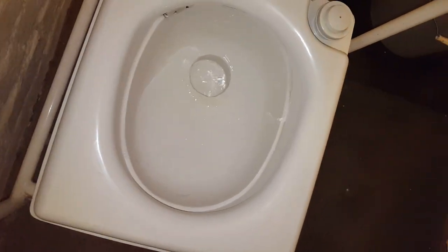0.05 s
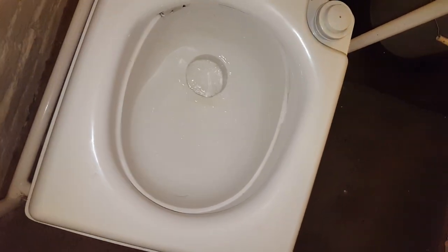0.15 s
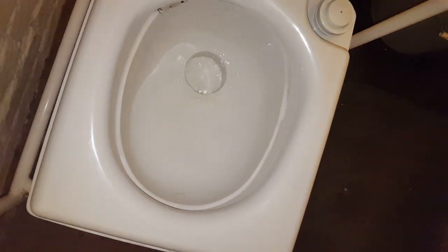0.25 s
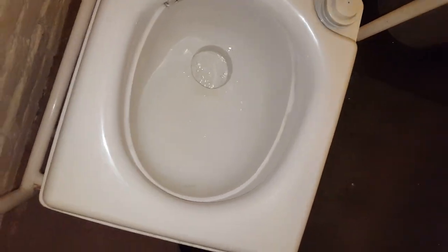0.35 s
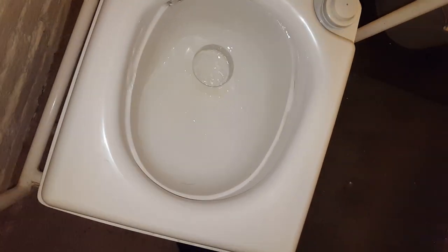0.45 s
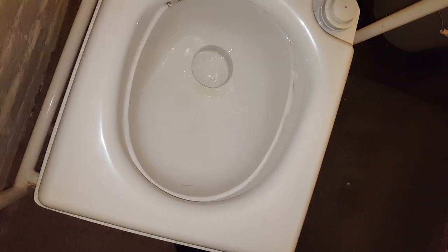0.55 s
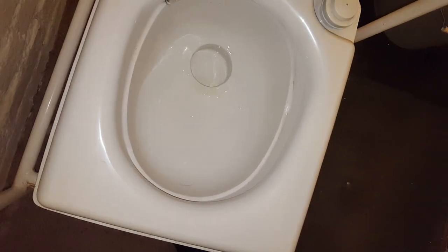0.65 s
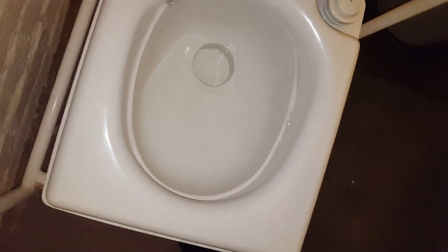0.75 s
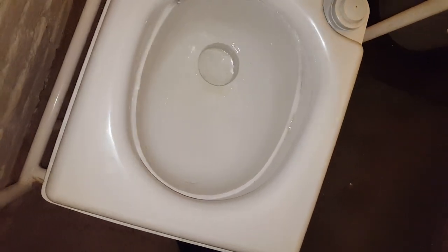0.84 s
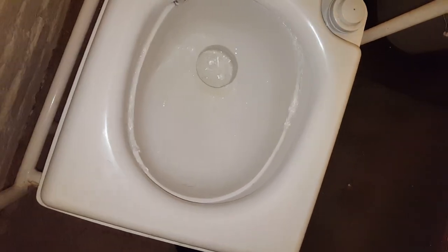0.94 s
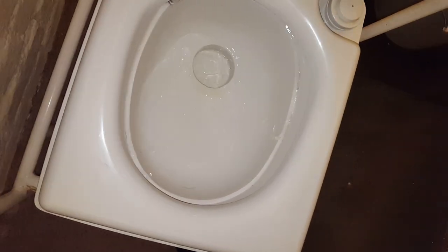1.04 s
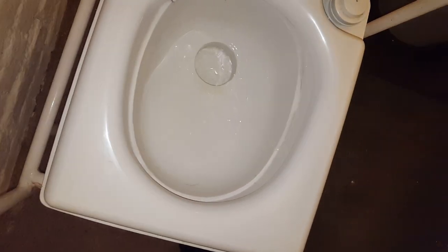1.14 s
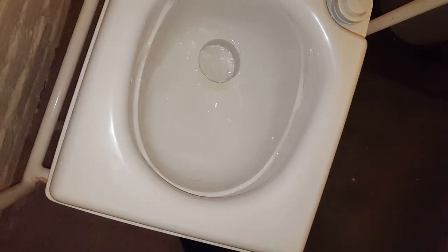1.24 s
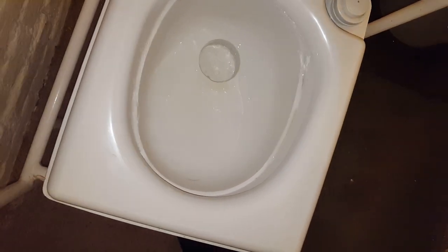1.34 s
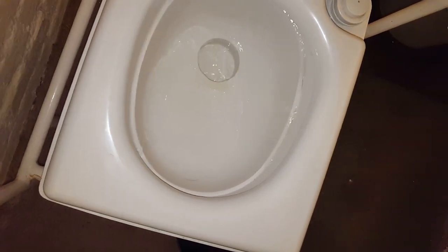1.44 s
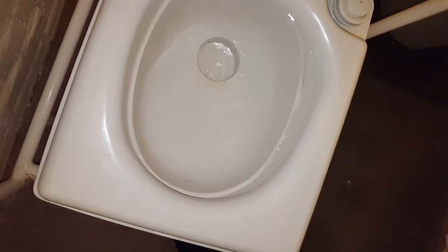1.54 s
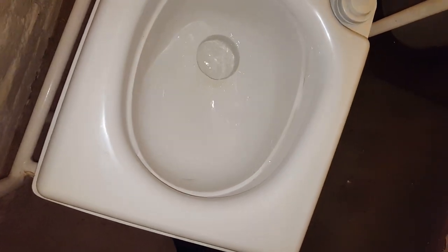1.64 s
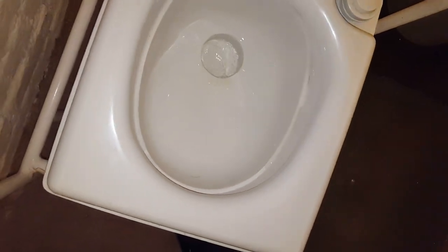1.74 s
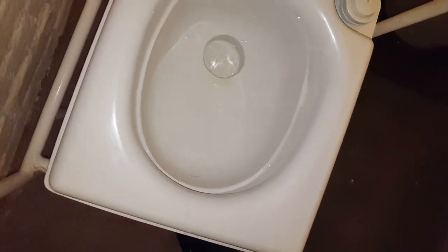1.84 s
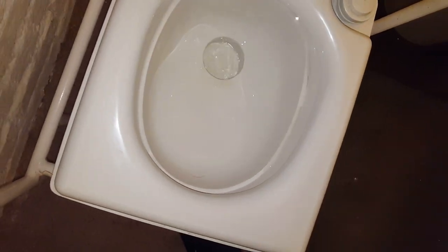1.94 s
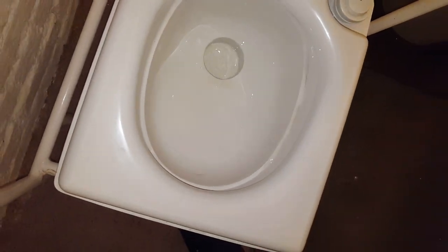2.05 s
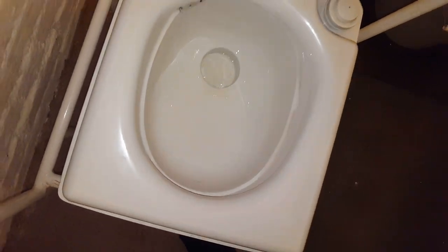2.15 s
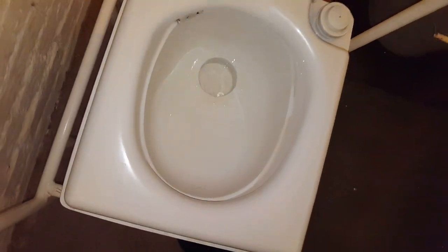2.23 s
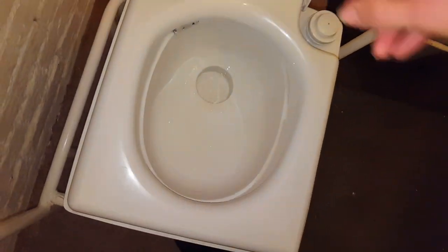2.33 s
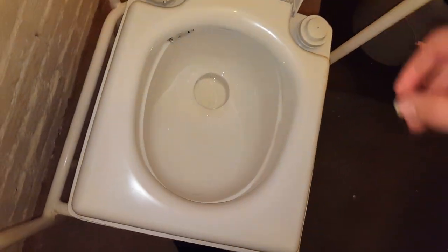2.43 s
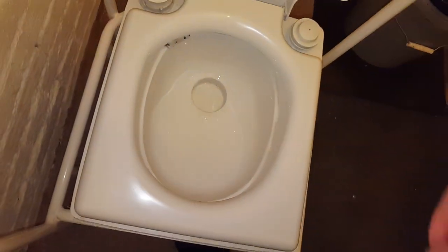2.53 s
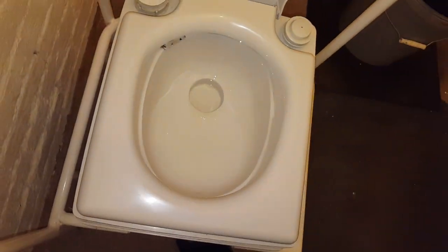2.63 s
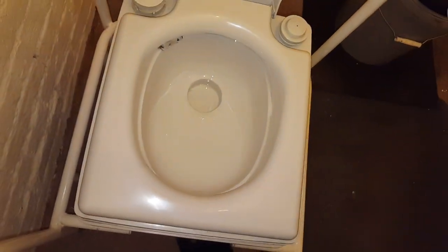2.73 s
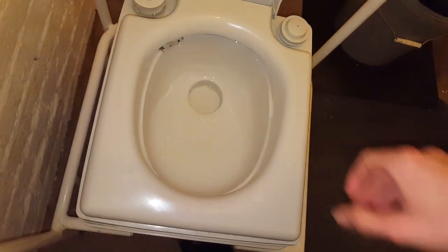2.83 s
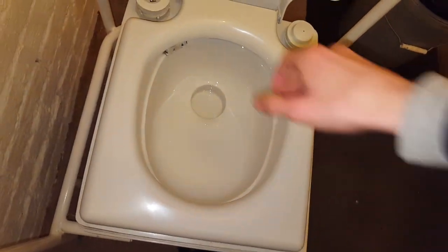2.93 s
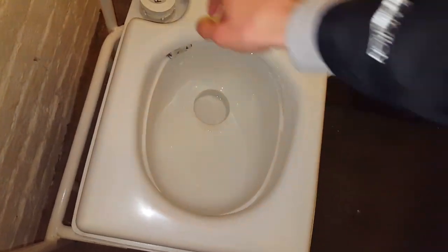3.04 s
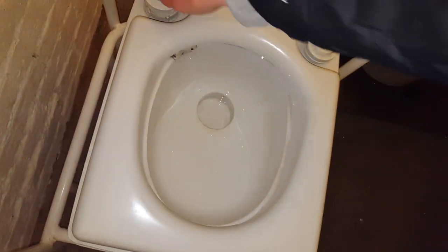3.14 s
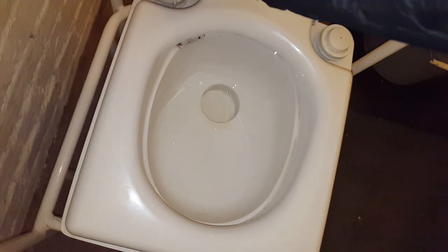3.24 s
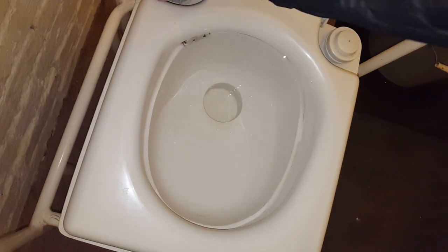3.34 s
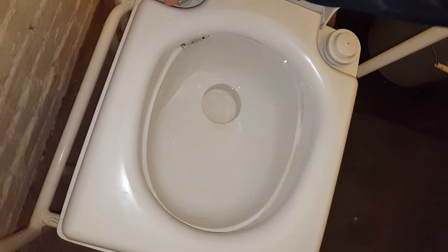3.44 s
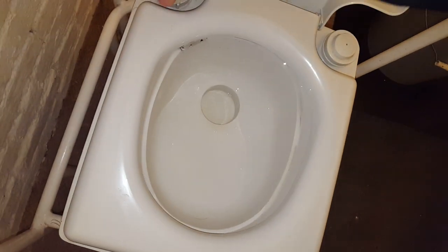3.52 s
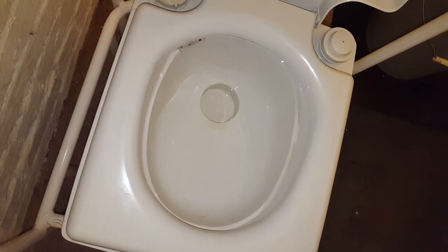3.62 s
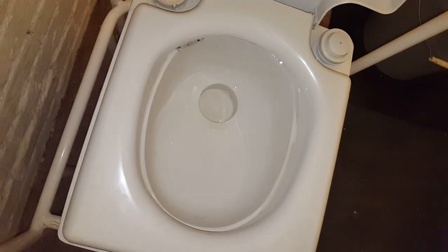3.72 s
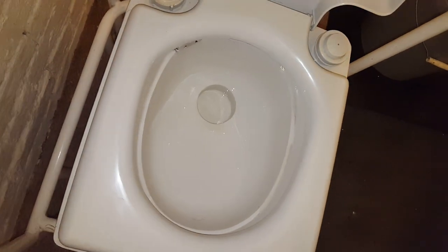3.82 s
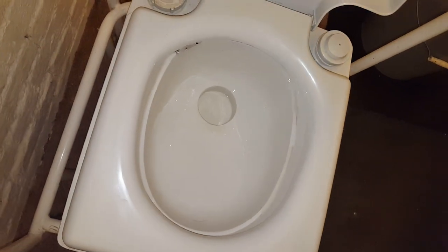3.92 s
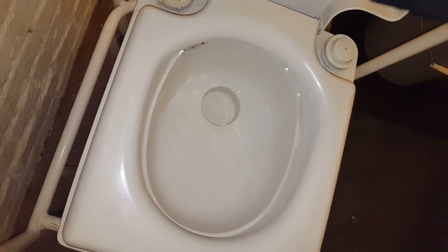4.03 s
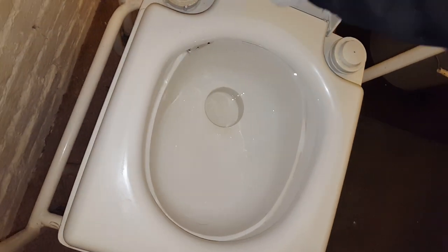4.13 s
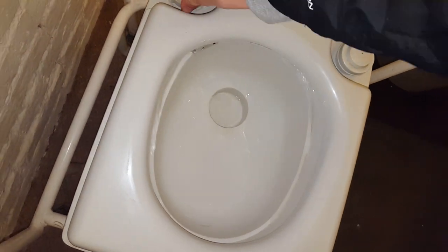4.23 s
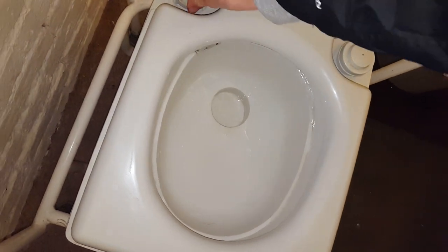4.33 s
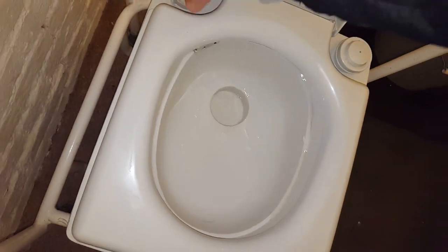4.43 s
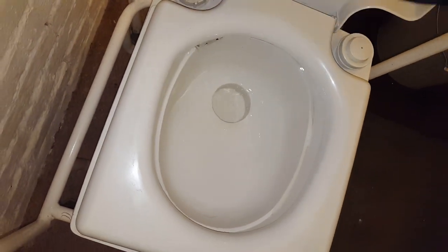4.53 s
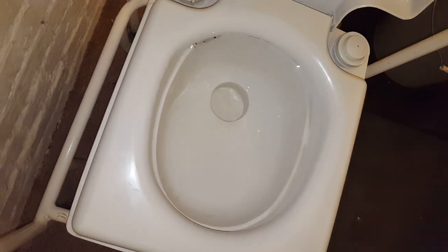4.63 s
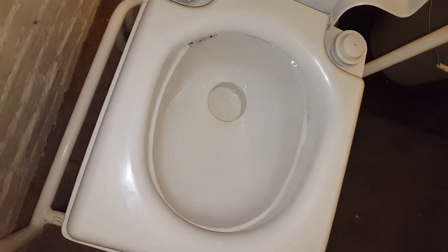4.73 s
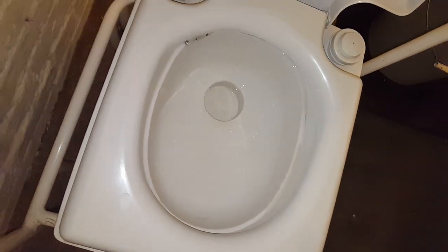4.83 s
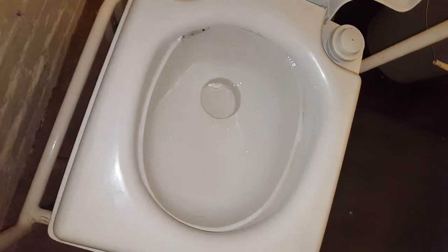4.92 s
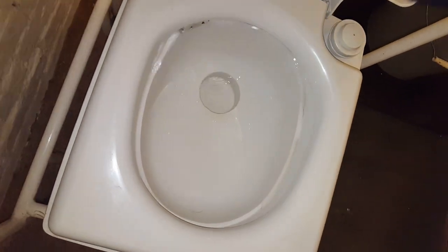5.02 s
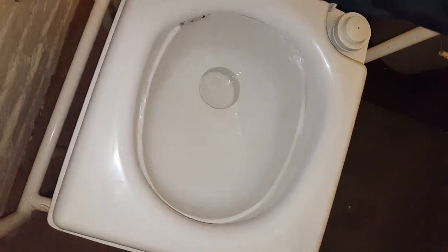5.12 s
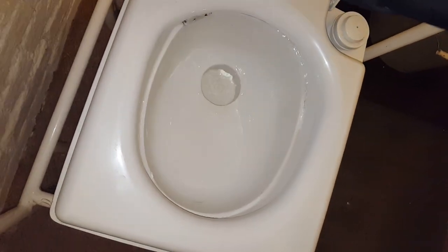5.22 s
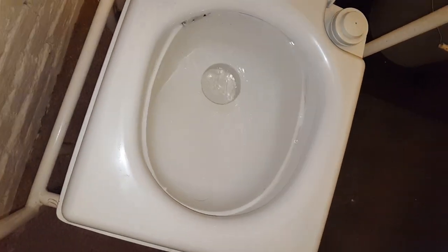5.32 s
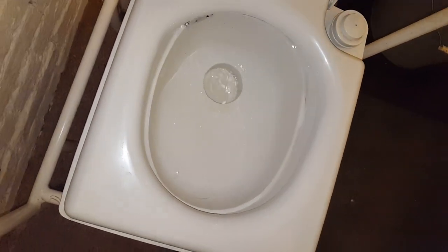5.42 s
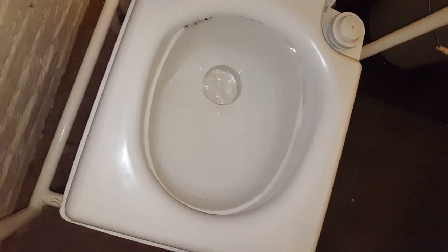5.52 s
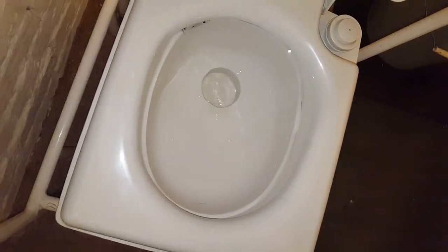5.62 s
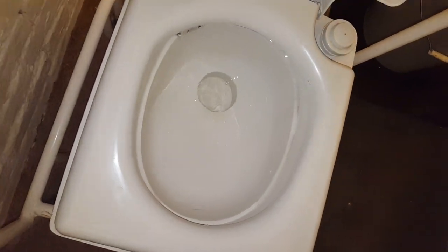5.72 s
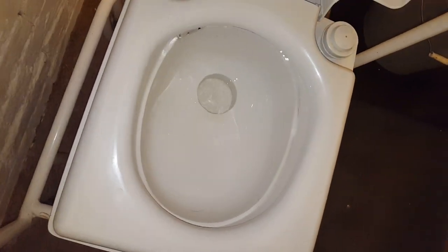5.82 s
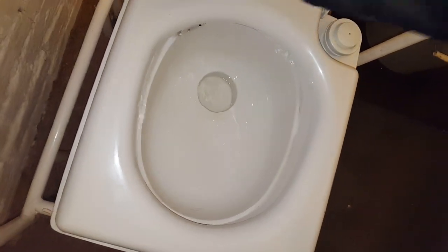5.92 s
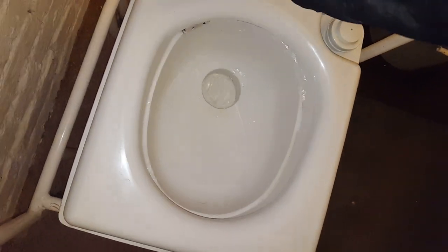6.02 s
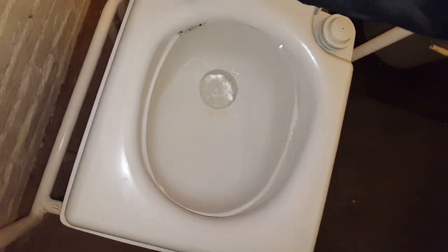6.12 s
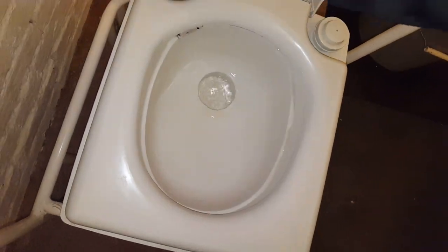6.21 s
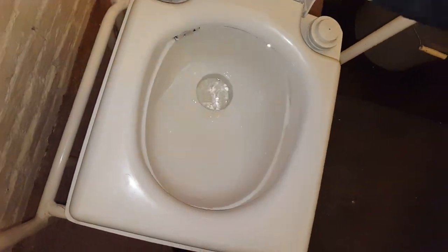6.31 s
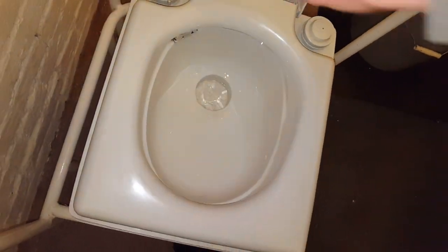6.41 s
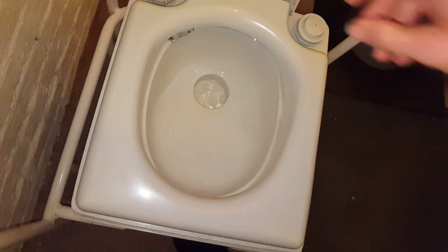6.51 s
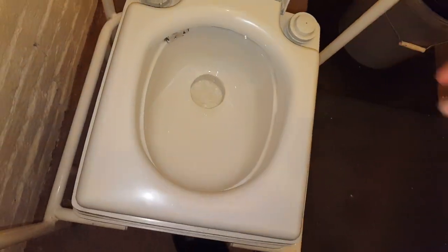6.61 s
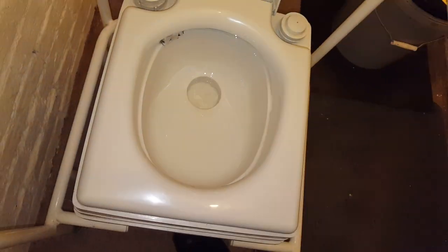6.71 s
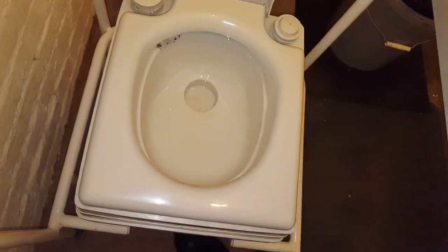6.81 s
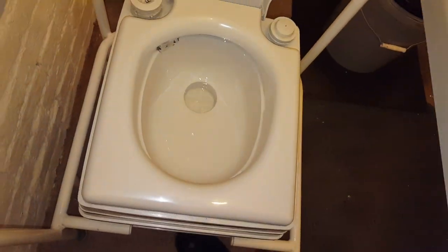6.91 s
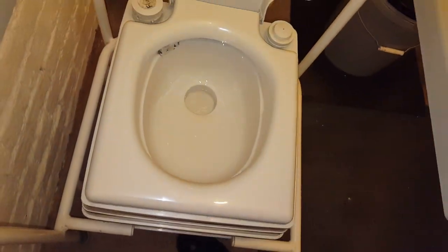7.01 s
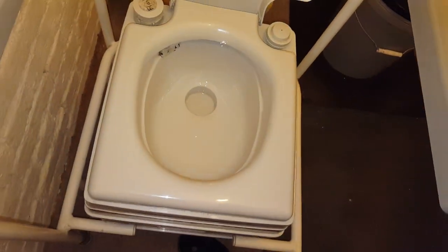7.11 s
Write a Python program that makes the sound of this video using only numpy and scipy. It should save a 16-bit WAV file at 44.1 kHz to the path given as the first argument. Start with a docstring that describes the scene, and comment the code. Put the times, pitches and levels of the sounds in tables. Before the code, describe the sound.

Heard in stereo from just over the bowl in a cramped outbuilding, a plastic piston clacks and bounces while water squirts, splashes and gurgles in brief bursts. The first run is fast and dense, followed by over a second of near silence with faint ticks and jacket rustling. Pumping then resumes with more space between strokes, a few bright cracks and watery gulps, ending in quiet with small ticks.

```python
"""In a small outbuilding a portable toilet is flushed by its hand pump, in two runs of strokes
heard from just above the bowl. Knocks ring resonances of the water tank and the plastic pump housing.
Filtered random drops and ringing air pockets make the water that gurgles, splashes and sprays.
Bursts of noise make the nozzle's spitting and the small ticks, low bending tones make the gulps of air,
and grainy noise makes a rustling jacket sleeve."""
import sys
import numpy as np
from scipy import signal
from scipy.fft import rfft, irfft, next_fast_len
from scipy.io import wavfile
from scipy.ndimage import uniform_filter1d, map_coordinates

SR = 44100
rng = np.random.default_rng(int(sys.argv[2]) if len(sys.argv) > 2 else 0)


def materialize(psi):
    """Save the field psi as 16-bit PCM at rate SR to the path in sys.argv[1].

    A 1-D psi becomes a single channel; in a 2-D psi each row is a channel.
    """
    bounded = np.clip(np.atleast_2d(psi).T, -1, 1)
    quanta = np.round(bounded * 32767).astype(np.int16)
    wavfile.write(sys.argv[1], SR, quanta)


N = 315756

# Event levels are balanced further where each sound is mixed; mode and colour levels are only relative.
# piston contacts: (time [s], tank thud [dB], housing knock [dB], crack [dB], rebound strength [0-1])
KNOCKS = [(.003, -27, -23.5, -43, 0.01), (.251, -17.5, -11.5, -25.5, 0.52),
          (0.307, -21.5, -13.5, -26, 0.78), (.347, -24.5, -18, -35, 0), (.666, -20, -12.5, -27.5, 0.8),
          (.728, -21.5, -33, -40, 0.3), (1.083, -18.5, -12.5, -26.5, 0.03),
          (1.115, -20.5, -15, -29.5, 0.01), (1.165, -33, -22.5, -37, 0.01), (1.244, -37, -23, -39.5, 0.02),
          (1.364, -31.5, -19, -42, 0.01), (1.395, -24.5, -24, -37, 0), (1.449, -27.5, -23, -32, 0),
          (1.498, -41.5, -29, -45.5, 0), (1.552, -35.5, -34, -39.5, 0), (1.648, -20.5, -15.5, -27, 0.03),
          (1.672, -36, -14, -26, 0), (1.702, -21.5, -16, -30.5, 0.64), (1.745, -21.5, -13.5, -17.5, 0.04),
          (1.862, -34.5, -32, -48, 0), (1.947, -45, -39.5, -64, 0), (3.333, -37.5, -35.5, -50, 0.34),
          (3.606, -34.5, -33, -52.5, 0), (3.666, -32.5, -26, -33.5, 0.05), (3.779, -20, -18.5, -32, .55),
          (3.833, -23, -20.5, -35, 0.27), (4.001, -54, -32, -40, 0.01), (4.063, -29, -28.5, -61, 0.01),
          (4.086, -26.5, -20, -34.5, 0.01), (4.272, -21.5, -16, -20, 0.23), (4.49, -32, -36, -41.5, 0.01),
          (4.886, -30, -23.5, -37.5, 0.01), (4.932, -22, -20.5, -38.5, 1), (5.147, -16.5, -15.5, -18, .33),
          (5.604, -26, -23.5, -52, 0.01), (5.64, -21.5, -28, -57, 0), (5.716, -37, -40.5, -51, 0.06),
          (5.791, -30.5, -33, -48.5, 0.01), (5.817, -26, -25, -49, 0.01), (6.005, -15, -16.5, -18, .25)]
REBOUND_S = .018  # a piston that bounces lands again this much later
# the tank and the closet around it: (frequency [Hz], level [dB], time to fall 60 dB [s])
TANK_MODES = [(81, -19, 0.32), (95, -29, 0.33), (136.3, -6.5, 0.43), (154, -6, 0.12), (210.5, -5, .32),
              (240.8, -7, 0.39), (255.2, -5, 0.19), (286.9, -7.5, 0.33), (328.95, -5, 0.13),
              (383.7, 0, 0.087), (401.9, 3, 0.09), (463, -6.5, 0.089), (522.7, -6, 0.15), (605, -8, 0.14)]
# the plastic pump housing: (frequency [Hz], level [dB], time to fall 60 dB [s])
HOUSING_MODES = [(694, -11.5, 0.012), (873, -7.5, .04), (948, 3, 0.038), (1110, -2.5, 0.043),
                 (1262, 3.5, 0.028), (1584, -3.5, 0.02), (1910, -9, 0.028), (2070, -21, 0.019),
                 (3820, -15, 0.01)]
# colour of the sharp contact: (frequency [Hz], level [dB])
CRACK_COLOUR = [(1200, -25), (2300, 3.5), (2900, -0.5), (3800, -1), (5000, -6.5), (6800, -8),
                (10000, -19.5), (14000, -26.5), (16000, -38)]
# colour of the loose plastic: (frequency [Hz], level [dB])
CLATTER_COLOUR = [(150, -38.5), (450, 7), (700, 1), (980, 9.5), (1400, 4.5), (2100, -6.5), (3200, -50.5)]
CLATTER_S, CRACK_S = .07, .013  # time to fall 60 dB, for loose plastic and for the contact itself
# the valve plate snaps shut: (time [s], level [dB])
VALVE = [(4.885, -31.5), (4.933, -48), (4.95, -36), (5.794, -44)]
# the ringing valve plate: (frequency [Hz], level [dB], time to fall 60 dB [s])
VALVE_MODES = [(3050, -5, .018), (3290, 1, .028), (3480, -1, .03), (3760, -8, .028)]

# pulls, pushes and small nudges of the piston: (start [s], length [s], tank gurgle [dB],
# bowl splash [dB], nozzle spray [dB], swell over the stroke [dB], centre pitch of air pockets [Hz])
STROKES = [(-.04, 0.03, -27, -37, -42, 6.5, 1220), (0.123, .21, -25.5, -28, -36.5, 15, 1093),
           (0.426, 0.06, -22, -18.5, -26, 4, 1153), (0.667, .06, -26.5, -28.5, -33.5, 1, 998),
           (0.831, 0.074, -16.5, -16.5, -22.5, 2, 1146), (1.087, .075, -31, -28, -35, -1, 1035),
           (1.282, 0.076, -22, -17.5, -24.5, 0, 1146), (1.418, 0.037, -25.5, -29.5, -36.5, -1, 1200),
           (1.614, 0.16, -25, -27, -34.5, 6.5, 1020), (3.37, 0.2, -47, -56, -78.5, 1, 900),
           (3.691, 0.083, -19.5, -26, -35, 1.5, 1178), (3.88, .1, -40, -42, -58, -8, 1097),
           (4.113, 0.18, -30, -30.5, -33.5, 2.5, 1024), (4.547, .075, -28, -24, -33.5, 3.5, 1030),
           (4.685, 0.026, -28, -24.5, -34.5, -0.5, 1053), (4.99, .17, -26, -26.5, -32.5, 6.5, 1068),
           (5.384, 0.22, -30.5, -29, -35.5, 3, 1242), (5.865, 0.17, -27, -29, -32, 2, 1046)]
# how the tank gurgle follows a stroke: (delay [s], rise [dB per s], fall [dB per s])
GURGLE_FLOW = (0.026, 220, 141)
# how the bowl splash follows a stroke: (delay [s], rise [dB per s], fall [dB per s])
SPLASH_FLOW = (.008, 220, 282)
# how the nozzle spray follows a stroke: (delay [s], rise [dB per s], fall [dB per s])
SPRAY_FLOW = (.001, 320, 235)
# after each stroke the water runs down the bowl, more weakly and for longer: level against the splash, fall
TRICKLE_DB, TRICKLE_DB_PER_S = -13.5, 105.5
# fine drops go on landing after the nozzle has stopped: level against the spray, fall
MIST_DB, MIST_DB_PER_S = -12, 112.5
# colour of water hitting the bowl: (frequency [Hz], level [dB])
SPLASH_COLOUR = [(200, -37.5), (500, -1.5), (690, -11), (950, -2), (1200, 1), (1600, -3), (2100, -4),
                 (2900, -24.5), (4500, -34), (7000, -36.5)]
# colour of the fine spray: (frequency [Hz], level [dB])
SPRAY_COLOUR = [(1200, -9.5), (2500, 1.5), (3300, 2.5), (4500, -4), (6800, -3.5), (8500, -7),
                (10500, -15.5), (13500, -16.5), (16000, -26.5)]
BUBBLE_SPREAD_DB = 3  # how unequal the air pockets are

# air gulps into the tank and its walls bump: (time [s], pitch it settles at [Hz], level [dB])
GULPS = [(0.021, 137.5, -23), (.173, 241, -16), (.28, 78, -23), (.714, 82.9, -24), (.855, 211, -16.5),
         (.891, 75, -27), (.935, 135, -13.5), (.951, 258.8, -17.5), (1.294, 81, -23), (1.33, 218, -17),
         (1.709, 88, -19.5), (2.05, 201, -58), (3.075, 85.5, -43), (3.25, 90.5, -40), (3.319, 92, -37.5),
         (3.678, 86, -24), (3.699, 237, -15.5), (3.787, 218.5, -13.5), (3.801, 321, -17),
         (3.826, 143.6, -16), (3.85, 234.5, -22.5), (5.13, 84.7, -21), (5.632, 242, -24),
         (5.886, 229.1, -22.5), (6.112, 139, -22.5), (6.32, 211, -41.5)]
# air spitting from the nozzle: (time [s], pitch [Hz], level [dB])
SPITS = [(0.415, 5800, -26.5), (0.817, 6000, -23), (0.828, 8600, -21.5), (1.264, 7080, -19.5),
         (3.641, 4000, -38), (3.665, 6800, -26.5), (3.678, 3160, -21.5), (3.691, 6220, -23),
         (3.719, 6000, -23.5), (4.136, 7520, -27), (4.696, 8330, -28), (5.093, 7040, -30.5)]
# small ticks of drips and of the hand on the plastic:
# (time [s], level [dB], pitch [Hz], factor that the band reaches below and above it)
TICKS = [(2.267, -54, 700, 2.2), (2.517, -46.5, 950, 1.85), (2.623, -49.5, 650, 1.4),
         (3.140, -42, 871, 1.7), (3.228, -33.5, 977, 3.7), (3.246, -36, 3000, 2.3),
         (3.279, -37.5, 594, 2.9), (3.335, -35, 1686, 2.1), (3.344, -34, 1284, 2.3), (3.38, -39, 562, 1.3),
         (3.478, -42, 770, 1.5), (3.559, -45, 900, 1.5), (4.453, -47.5, 3200, 2.2),
         (5.281, -41.5, 2790, 3.9), (6.461, -37, 1930, 1.45), (6.622, -44.5, 1050, 1.8)]

# tail of the closet: (frequency [Hz], time to fall 60 dB [s])
CLOSET_TAIL = [(120, 0.52), (400, 0.27), (1200, 0.18), (3000, 0.14), (10000, 0.1)]
# likeness of left and right in spread sound: (frequency [Hz], likeness [0-1])
ALIKE = [(130, 0.98), (290, 0.99), (640, 0.77), (1400, 0.25), (3100, 0.071), (6800, 0)]
# tilt of the toilet between the sides: (frequency [Hz], level up on the left and down on the right [dB])
LEAN = [(150, 0.7), (500, -1.2), (1200, 0.5), (4500, 1.27), (9000, 1)]
LAG = 4  # samples by which the right microphone hears the toilet later

# sweeps of the arm, reaching and drawing back: (time when fastest [s], half length [s], rustle [dB])
SLEEVE = [(2.52, 0.19, -55), (2.922, 0.22, -58.5), (3.21, 0.15, -44), (3.504, 0.077, -51),
          (6.336, 0.094, -52.5), (6.692, .17, -50.5)]
SLEEVE_REST_DB = -68  # the arm is never quite still
# colour of the rubbing sleeve: (frequency [Hz], level [dB])
NYLON_COLOUR = [(40, -19), (140, -8), (300, -13), (800, -16.5), (1500, -18.5), (3200, -17), (8000, -23.5),
                (10500, -31), (14000, -28.5), (16000, -36)]
# colour of the still background: (frequency [Hz], level [dB])
STILL_COLOUR = [(20, 5.5), (45, 2), (107, -15.5), (150, -5), (175, -11.5), (262, -13.5), (660, -12.5),
                (1150, -21.5), (4500, -23.5), (16000, -31)]
TOP_HZ = 16100  # nothing is kept from here up


def amp(db):
    """Turn decibels into gain."""
    return 10 ** (np.asarray(db) / 20)


def unit(x, size=None):
    """Scale x so that its first samples (all by default) have an average strength (rms) of 1."""
    return x / np.sqrt(np.mean(x[..., :size] ** 2) + 1e-20)


def even(x, size):
    """Take out slow swells: the strength stays near 1 over any window of size samples."""
    power = uniform_filter1d(np.mean(x ** 2, axis=0), size)
    return x / np.sqrt(np.abs(power) + 1e-12)


def along(points, hz):
    """Read (frequency, value) points at hz, evenly by musical interval."""
    f, v = np.transpose(points)
    return np.interp(np.log(hz + 1), np.log(f + 1), v)


def curves(rows):
    """Draw one value per sample for each column after the time."""
    s, *cols = np.transpose(rows)
    return [np.interp(np.arange(N) / SR, s, c) for c in cols]


def wobble(rate):
    """Draw a smooth random curve through rate points a second."""
    points = rng.standard_normal(int(N * rate / SR) + 4)
    return map_coordinates(points, [np.arange(N) * rate / SR])


def fade(t60):
    """A third of a second of dying away, by 60 dB every t60 seconds."""
    return amp(-60 * np.arange(SR // 3) / SR / t60)


def add(track, s, sound):
    """Mix a sound into a track at time s."""
    room_left = track[:, max(0, round(s * SR)):][:, :sound.shape[-1]]
    room_left += sound[..., :room_left.shape[-1]]


def colour(x, points, size=4096):
    """Filter x to the given spectrum without any sound ahead of its cause (minimum phase)."""
    cepstrum = irfft(np.log(amp(along(points, np.fft.rfftfreq(size, 1 / SR)))))
    # folding the second half onto the first puts the filter's energy as early as possible
    cepstrum[1:size // 2] *= 2
    cepstrum[size // 2 + 1:] = 0
    response = irfft(np.exp(rfft(cepstrum)))
    return signal.fftconvolve(x, response[None], axes=1)[:, :x.shape[1]]


def spread(pair):
    """Turn two unrelated signals into left and right: alike in the bass, apart in the treble."""
    size = pair.shape[1]
    likeness = np.clip(along(ALIKE, np.fft.rfftfreq(size, 1 / SR)), -1, 1)
    turn = np.arccos(likeness) / 2
    mid, side = irfft(rfft(pair) * [np.cos(turn), np.sin(turn)], size)
    return np.array([mid + side, mid - side])


def noise(size):
    """Hiss that seems to come from all around."""
    return spread(rng.standard_normal((2, size)))


def drops(rate, size_db):
    """Random impacts of uneven size, about rate a second in each of the two signals spread out."""
    hits = rng.random((2, N)) < rate / SR
    sizes = amp(size_db * np.clip(rng.standard_normal((2, N)), -2, 2))
    return spread(hits * sizes * rng.choice([-1, 1], (2, N)))


def ring(modes, scatter_db, detune):
    """One blow starts every mode as a fading tone; higher ones reach the two ears out of step."""
    t = np.arange(SR // 3) / SR
    out = np.zeros((2, len(t)))
    for k, (hz, db, t60) in enumerate(modes):
        size, shift = rng.standard_normal(2)
        skew = np.arccos(np.clip(along(ALIKE, hz), -1, 1)) / 2 * rng.choice([-1, 1, 1])
        phase = 2 * np.pi * hz * (1 + detune * shift) * t + np.array([[skew], [-skew]])
        strength = (-1) ** k * amp(db + scatter_db * size)
        out += strength * fade(t60) * np.sin(phase)
    return out * (1 - np.exp(-t / 0.0011))  # a soft start


def contacts():
    """Yield each piston contact and its weaker or equal rebound: (time, thud dB, knock dB, crack dB)."""
    for s, *levels_db, rebound in KNOCKS:
        yield s, *levels_db
        if rebound > 0:
            yield s + REBOUND_S, *(np.array(levels_db) + 20 * np.log10(rebound))


def knocks():
    """Each contact thuds the tank, rings the housing and cracks; loose plastic clatters on briefly."""
    out = np.zeros((2, N))
    for s, thud_db, knock_db, crack_db in contacts():
        thud = unit(ring(TANK_MODES, scatter_db=4.0, detune=0.0099), size=970)
        housing = unit(ring(HOUSING_MODES, scatter_db=2.0, detune=0.012), size=530)
        grit = noise(thud.shape[1])
        clatter = unit(colour(grit * fade(CLATTER_S), CLATTER_COLOUR), size=530)
        knock = unit(housing + amp(-0.5) * clatter, size=530)
        # a hard stop is bright; a contact cushioned by water loses its top octaves
        hardness_db = .5 * np.clip(crack_db - knock_db + 6.5, -7, 6)
        shape = [(hz, db + hardness_db * np.clip(np.log2(hz / 3500), 0, 1.5)) for hz, db in CRACK_COLOUR]
        decay = fade(CRACK_S) + amp(-11) * fade(.14)
        crack = unit(colour(grit * decay, shape), size=530)
        add(out, s, amp(thud_db - 3.0) * thud + amp(knock_db) * knock + amp(crack_db) * crack)
    for s, db in VALVE:
        snap = unit(ring(VALVE_MODES, scatter_db=3, detune=0.005352), size=530)
        add(out, s, amp(db) * snap)
    return out


def flow(levels_db, delay, rise, fall):
    """Level in dB of one part of the water: it rises, changes over the piston's stroke, and falls away."""
    t = np.linspace(0, N / SR, num=4000)
    each = []
    for (start, length, *_, swell_db, _), db in zip(STROKES, levels_db):
        age = t - start - delay
        held = np.clip(age, 0, length)
        moving_db = db + swell_db * (held / length - .5)
        before_db = rise * np.maximum(-age, 0)
        after_db = fall * np.maximum(age - length, 0)
        each.append(moving_db - before_db - after_db)
    return curves(np.column_stack([t, np.max(each, axis=0)]))[0]


def bubbles(rate, centre_hz, cycles, rise):
    """Air pockets ring near a moving pitch, gliding up as they lose 40 dB over some cycles."""
    out = np.zeros((2, N))
    t = np.arange(SR // 20) / SR
    count = int(rate * N / SR)
    starts = rng.integers(N, size=count)
    for start, (pitch, size, side) in zip(starts, rng.standard_normal((count, 3))):
        hz = centre_hz[start] * np.exp(.22 * pitch)
        age = t * hz / cycles
        glide = 1 + rise * np.minimum(age, 2) / 2
        phase = 2 * np.pi * hz * t * glide + np.array([[.6], [-.6]]) * side
        life = amp(BUBBLE_SPREAD_DB * np.clip(size, -2, 2) - 40 * age) * (1 - np.exp(-t * hz))
        add(out, start / SR, life * np.sin(phase))
    return unit(out)


def water():
    """Every stroke churns the tank and throws a spluttering sheet of drops against the bowl."""
    start, length, gurgles_db, splashes_db, sprays_db, _, pockets_hz = np.transpose(STROKES)
    # how loud each part of the water is
    gurgle_db = flow(gurgles_db, *GURGLE_FLOW)
    delay, rise, _ = SPRAY_FLOW
    mist_db = flow(sprays_db + MIST_DB, delay, rise, MIST_DB_PER_S)
    spray_db = np.maximum(flow(sprays_db, *SPRAY_FLOW), mist_db)
    delay, rise, _ = SPLASH_FLOW
    trickle_db = flow(splashes_db + TRICKLE_DB, delay, rise, TRICKLE_DB_PER_S) + 1.7 * wobble(38)
    splash_db = np.maximum(flow(splashes_db, *SPLASH_FLOW), trickle_db)
    pocket_hz, = curves(np.column_stack([start + length / 2, pockets_hz]))
    pocket_hz = pocket_hz * np.exp(0.072 * wobble(12))
    # random impacts ring the tank, or are coloured as splash and spray
    churn = drops(rate=400, size_db=2.5)[:1]
    tank_ring = ring(TANK_MODES, scatter_db=0.22, detune=0)
    tank = unit(signal.fftconvolve(churn, tank_ring, axes=1)[:, :N])
    gurgle = even(tank, size=2000)
    splash = unit(colour(drops(rate=900, size_db=1.5), SPLASH_COLOUR))
    fine_drops = unit(drops(rate=1500, size_db=5))
    spray = unit(colour(fine_drops + amp(-3) * noise(N), SPRAY_COLOUR))
    # trapped air: large pockets ring in the bowl, fine ones fizz in the spray
    pockets = bubbles(rate=340, centre_hz=pocket_hz, cycles=22, rise=.1)
    fizz = bubbles(rate=260, centre_hz=4 * pocket_hz, cycles=36, rise=.1)
    splash = even(splash + amp(0.5) * pockets, size=2400)
    spray = even(spray + amp(-4) * fizz, size=3000)
    # the jet breaks into lumps that land unevenly
    splutter = wobble(70)
    splash = splash * amp(2 * splutter)
    spray = spray * amp(0.74 * splutter)
    return amp(gurgle_db - 5.5) * gurgle + amp(splash_db - 1.0) * splash + amp(spray_db - 0.5) * spray


def gulps():
    """Air gulps and tank wall bumps: a low push bends upwards as it dies and shudders unevenly."""
    out = np.zeros((2, N))
    t = np.arange(SR // 3) / SR
    for s, hz, db in GULPS:
        bent_time = t - .003 * (1 - np.exp(-t / .02))
        shudder = .6 * wobble(45)[:len(t)]
        phase = 2 * np.pi * hz * bent_time + shudder
        swell = (1 - np.exp(-t / .008)) ** 2 * (fade(.1) + amp(-21) * fade(.5))
        add(out, s, amp(db + 8) * swell * np.sin(phase))
    return out


def burst(low_hz, high_hz, t60, skirt_db):
    """A short puff of noise, strongest in one band and weaker by skirt_db and more outside it."""
    shape = [(low_hz / 8, 2 * skirt_db), (low_hz / 1.5, skirt_db), (low_hz, 0),
             (high_hz, 0), (high_hz * 1.04, skirt_db), (high_hz * 4, 4.8 * skirt_db)]
    decay = fade(t60)
    return unit(colour(noise(len(decay)) * decay, shape), size=220)


def spits_and_ticks():
    """Trapped air bursts from the nozzle; drips and the hand tick on the plastic."""
    out = np.zeros((2, N))
    for s, hz, db in SPITS:
        add(out, s, amp(db) * burst(hz / 1.05, hz * 1.12, t60=0.038, skirt_db=-9))
    for s, db, hz, span in TICKS:
        add(out, s, amp(db) * burst(hz / span, hz * span, t60=0.0083, skirt_db=-7.5))
    return out


def closet(x):
    """The close walls answer with a short tail of fading noise that is longest in the bass."""
    hz, t, z = signal.stft(noise(SR // 2), SR, nperseg=256)
    decay = amp(-60 * t / along(CLOSET_TAIL, hz)[:, None])
    tail = signal.istft(z * decay, SR, nperseg=256)[1]
    wait = int(.006 * SR)  # 6 ms before the walls answer
    tail = np.pad(tail / np.linalg.norm(tail[0]), ((0, 0), (wait, 0)))
    return signal.fftconvolve(x, tail, axes=1)[:, :N]


def sleeve():
    """Nylon slides over itself in fine uneven grains, a little to the right; sweeps swell and fade."""
    t = np.arange(N) / SR
    power = amp(SLEEVE_REST_DB) ** 2
    for s, half, db in SLEEVE:
        sweep = amp(db) / (1 + ((t - s) / half) ** 2 / 2) ** 2
        power = power + sweep ** 2
    rustle = np.sqrt(power)
    grains = unit(drops(rate=1300, size_db=5.5)) + amp(6) * noise(N)
    grains = unit(colour(grains, NYLON_COLOUR))
    return rustle * amp(1.0 * wobble(32)) * grains * amp([[-.7], [.7]])


def still():
    """A faint, steady background of coloured noise."""
    return amp(-61) * unit(colour(noise(N), STILL_COLOUR))


def scene():
    """Pump, water and small sounds in the closet, with the sleeve and a faint still background."""
    pump, flush, small = knocks(), water() + gulps(), spits_and_ticks()
    echo = closet(amp(-8.5) * pump + amp(-10.5) * flush + amp(-6.5) * small)
    near = pump + flush + small + echo
    # the bowl throws its treble a little to the left
    left = colour(near[:1], LEAN)
    right = colour(near[1:], [(hz, -db) for hz, db in LEAN])
    toilet = np.vstack([left, np.roll(right, LAG, axis=1)])
    return toilet + sleeve() + still()


def record(dry):
    """Weaken the deepest bass and keep nothing above the band limit."""
    size = next_fast_len(N + SR // 2)
    low_cut = signal.sosfilt(signal.butter(2, 48, "highpass", fs=SR, output="sos"), dry)
    kept = np.fft.rfftfreq(size, 1 / SR) < TOP_HZ
    return irfft(rfft(low_cut, size) * kept, size)[:, :N]


dry = scene()
out = record(dry)
materialize(out)
```